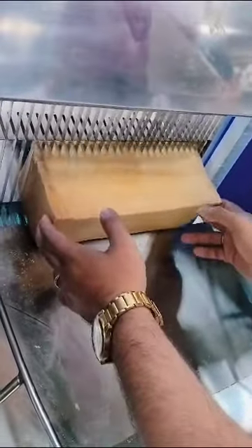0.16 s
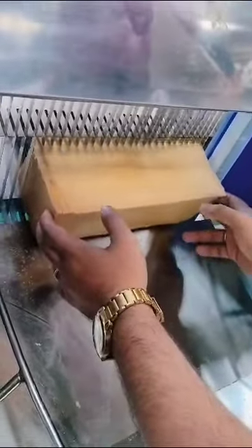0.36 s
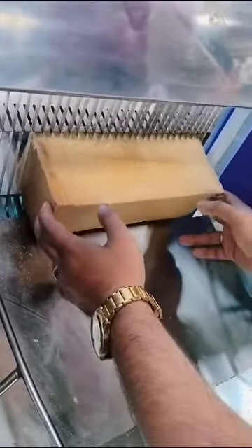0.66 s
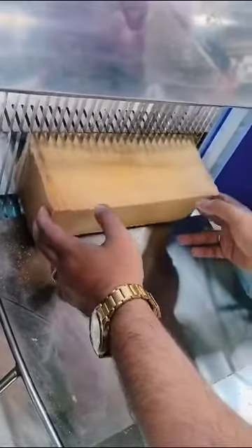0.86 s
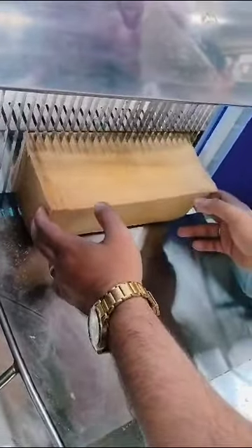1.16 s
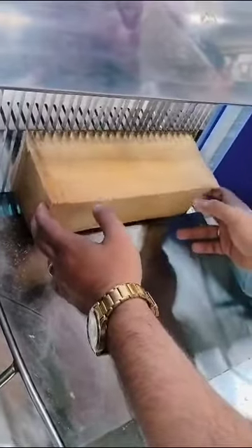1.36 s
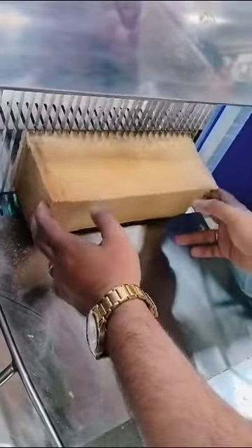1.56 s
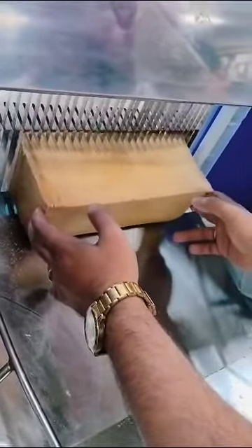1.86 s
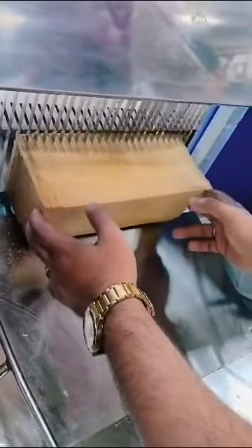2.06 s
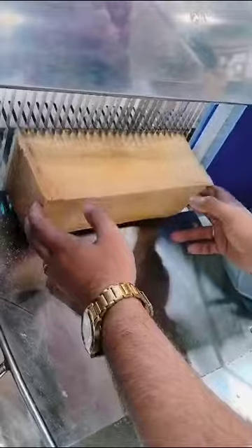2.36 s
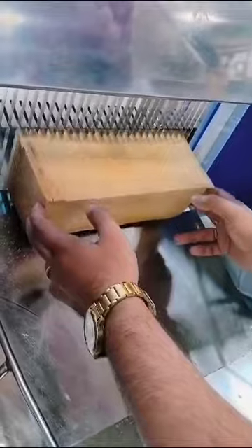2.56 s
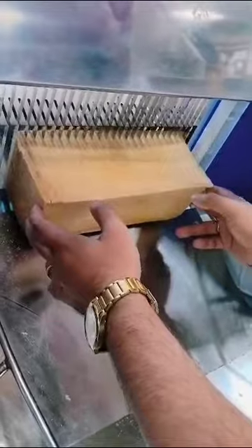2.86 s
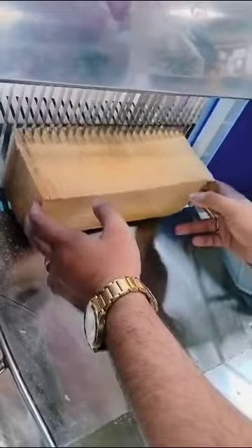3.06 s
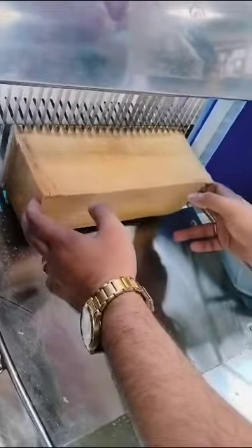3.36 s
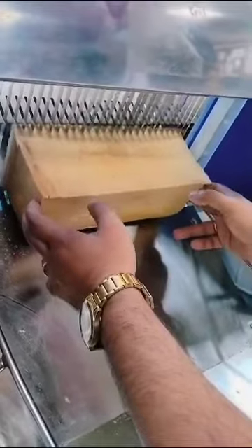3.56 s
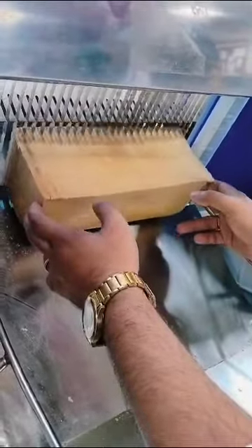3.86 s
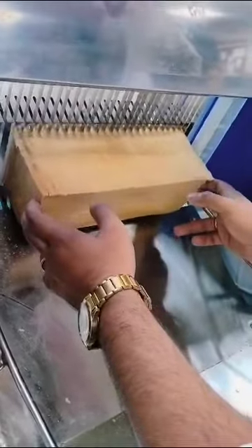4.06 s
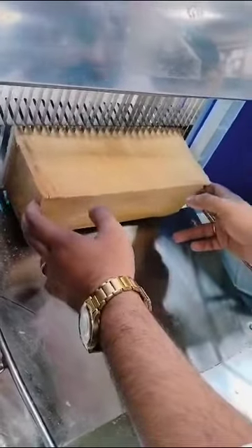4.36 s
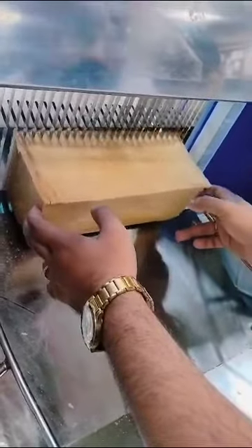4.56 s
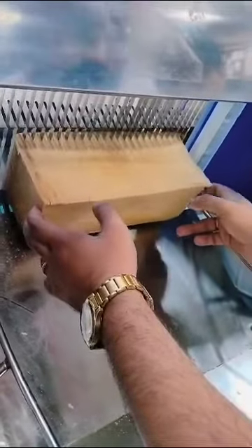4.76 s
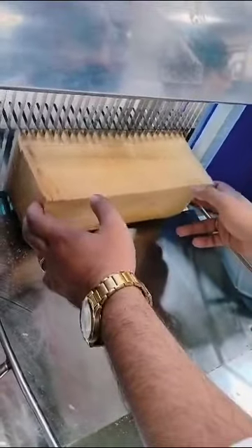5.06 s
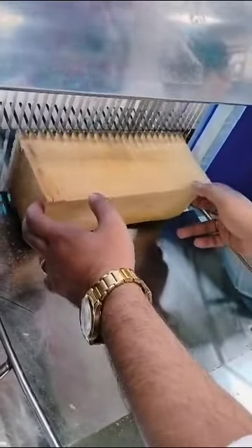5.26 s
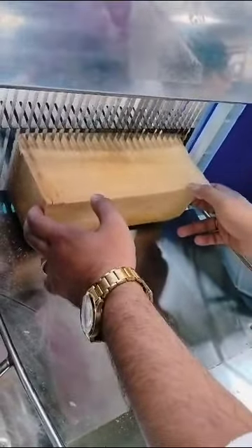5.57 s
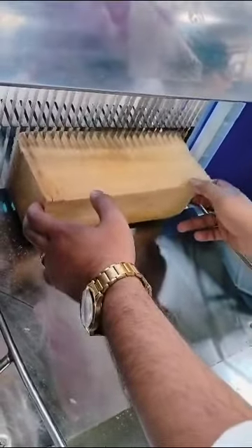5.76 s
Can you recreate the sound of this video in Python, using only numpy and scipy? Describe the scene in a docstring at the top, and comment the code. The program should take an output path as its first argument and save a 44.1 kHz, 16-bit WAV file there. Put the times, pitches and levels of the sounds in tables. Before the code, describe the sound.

A bread slicing machine is already running and never stops. A low housing hum throbs under a quick metal rattle, about nine shakes a second, while a fluttering motor whine dips about twice a second. Blades rasp softly through a loaf, with small scrapes and crust crackles. Rough judders crowd the first two and a half seconds, then thin out, bunching again near five. Close stereo pickup, with short metallic reflections.

```python
"""An electric bread slicer runs steadily close by while a loaf is eased into its blades.
From the start a belt-driven crank shakes the blade frames about nine times a second: the housing
throbs, the linkage rattles, the motor whine sags about twice a second, blades rasp, catch and ring.
Judders crowd the first 2.5 s, then thin out; the whine swells at 4 s and drops at once.
More judders bunch near 4.9 s; the rasp then rises near 5.0, 5.5 and 5.9 s."""
import sys
import numpy as np
from scipy import signal
from scipy.fft import rfft, irfft
from scipy.io import wavfile
from scipy.ndimage import uniform_filter1d, minimum_filter1d

SR = 44100
rng = np.random.default_rng(int(sys.argv[2]) if len(sys.argv) > 2 else 0)


def output_pcm(signal):
    """Save a mono or channel-first signal as 16-bit PCM at the path in sys.argv[1].

    Samples are clipped to [-1, 1] before scaling.
    """
    pcm = np.clip(np.atleast_2d(signal).T, -1, 1) * 32767
    wavfile.write(sys.argv[1], SR, np.round(pcm).astype(np.int16))


N = 260631

CRANK_HZ, STROKES_PER_BELT = 8.9, 4
BELT_HZ = CRANK_HZ / STROKES_PER_BELT  # belt turns
MAIN_WHINE_HZ = 851.6
BEAT_HZ, THROB_CREST_S = 178.05, 3.535
KNOCK_DB = -14.5
SURGE_HZ, SURGE_CREST_S, SURGE_RASP_DB = 2.1, 0.03, 1
CRUST_SPREAD_DB, CRUST_RATE_HZ = 0.8, 22
LOAD_SPREAD_DB, LOAD_RATE_HZ = 1.5, 7.7
TOP_CUT_HZ = 15700

# weak housing tones of crank, motor and mains, before hum gain: tone_hz, level_db
WEAK_HUM = [(80.12, -46), (97.95, -47), (99.95, -45.5), (160.24, -39), (169.1, -42), (175.8, -42),
            (180.05, -40), (186.96, -41), (188.94, -41), (213.71, -39), (233.56, -36), (280.02, -39),
            (281.97, -37), (284.83, -37), (342.3, -38.5), (344.8, -39), (377.8, -39.5)]
# strong housing tones that beat, before hum gain: tone_hz, level_db
THROB_TONES = [(182.09, -23.3), (191.0, -29), (195.9, -34), (197.86, -31), (199.92, -30)]
# tone at BEAT_HZ, throbs about four times a second against the strongest tone,
# before hum gain: time_s, level_db
BEAT_LEVEL = [(0, -31), (1.4, -28), (3.1, -26.5), (4.6, -29), (5.1, -39), (5.91, -38)]
# overtones of the belt's free span: multiple, relative_db
BELT_OVERTONES = [(3, -4.5), (4, -0.5), (5, -3)]
# frame response to linkage rattle: freq_hz, relative_db
FRAME_RESPONSE = [(25, -46), (45, -42.5), (70, -21.5), (140, -9), (215, -4.5), (280, -9.5), (390, -3.5),
                  (520, -8), (700, -11.5), (820, -2.5), (920, -3.5), (1100, -18.5), (1500, -27),
                  (2200, -28.5), (5000, -48.5)]
# ringing steel panels: freq_hz, width_hz, relative_db
PANEL_MODES = [(249.1, 8.1, 2), (285, 12, 0), (323.5, 16, -0.5), (344, 26, -7.5), (379.5, 24, -1.5),
               (427.4, 14, -6), (462, 35, -11), (528, 25, -4), (610.3, 23, -6), (826, 30, 0),
               (887, 24, -5.5), (949.6, 30, -6), (1024, 33, -17)]
# frames shake harder and a panel growls: crest_s, pitch_hz, level_db
JUDDER_EVENTS = [(0.03, 375, -17.5), (0.3, 370, -18), (0.37, 335, -21.5), (0.5, 250, -24),
                 (0.64, 380, -20.5), (0.73, 290, -21.5), (0.82, 385, -20.5), (0.97, 250, -24),
                 (1.04, 375, -23), (1.18, 285, -23.5), (1.35, 250, -21), (1.49, 390, -21),
                 (1.64, 285, -19.5), (2.0, 345, -23), (2.08, 290, -21.5), (2.21, 255, -22),
                 (2.34, 235, -20), (2.41, 370, -20.5), (3.04, 375, -20), (3.09, 285, -21.5),
                 (3.45, 375, -19.5), (3.84, 320, -22.5), (4.09, 295, -23.5), (4.36, 345, -20.5),
                 (4.64, 310, -21), (4.86, 605, -26), (4.87, 425, -18.5), (4.91, 320, -21.5),
                 (4.92, 552, -25.5), (4.94, 435, -21.5), (5.68, 375, -23.5), (5.79, 285, -20.5)]
# main whine sags under load: crest_s, half_length_s
WHINE_SAGS = [(0.39, .05), (0.87, .05), (1.35, .07), (1.79, .08), (2.3, .06), (2.88, .04), (3.23, .07),
              (3.67, .07), (3.86, .04), (4.12, .04), (4.33, .05), (4.84, .08), (5.5, .05), (5.9, .05)]
# higher motor tones, before load gain: tone_hz, level_db, flutter_scale_rad
HIGH_WHINE = [(949.6, -32.7, .55), (1702, -50.5, .5), (2686, -50, .5), (3809, -60, .7), (4216, -59, .7),
              (5782, -60, .35)]
# motor sings louder and softer with load: time_s, gain_db
MOTOR_LOAD = [(0.0, -1), (0.38, -0.5), (0.85, -3), (1.2, 0), (1.5, 0), (1.78, -4), (1.91, 0.5),
              (2.09, -1.5), (2.7, -2), (3.2, -1.5), (3.4, 1), (3.68, -1), (4.02, 4), (4.13, -9),
              (4.48, 1.5), (4.84, -3), (5.1, 1), (5.91, -0.5)]
# load over one stroke: crank_angle_deg, whine_db, blade_db
STROKE_LOAD = [(0, 0.5, 5), (54.4, 4.5, 5), (101, -2, 2.9), (175, 4.3, 4), (205, 0.5, 6.5), (246, 3.5, 5.5),
               (270, 2.2, 4.5), (312, 0, 3)]
# a blade catches and scrapes: crest_s, pitch_hz, level_db
ZING_EVENTS = [(0.074, 2490, -29.5), (0.074, 4100, -41), (0.46, 4200, -36.5), (0.634, 2560, -30.5),
               (0.634, 4480, -38), (0.803, 1404, -26), (0.85, 2715, -32), (1.014, 2620, -38),
               (1.364, 1585, -31), (1.802, 4240, -38), (1.939, 1550, -31.5), (1.985, 4005, -44),
               (1.991, 2990, -36), (2.315, 2920, -33), (2.378, 2600, -32), (2.416, 1460, -29),
               (2.879, 2755, -36), (3.82, 2355, -31), (3.859, 1520, -31.5), (3.939, 1380, -28),
               (4.223, 1313, -33.5), (4.296, 2314, -33), (4.48, 1643, -33), (4.899, 2475, -34),
               (4.927, 1445, -28), (5.007, 2740, -31), (5.135, 2330, -34), (5.336, 1810, -30),
               (5.567, 2900, -37), (5.69, 2620, -33)]
# crust snaps and scrapes, before snap gain: crest_s, half_length_s, peak_db
SNAP_EVENTS = [(0.075, .018, -22), (0.175, .012, -29), (0.64, .016, -26), (1.986, .016, -22),
               (2.18, .008, -28), (2.318, .024, -24), (2.42, .012, -24), (2.88, 0.013, -23),
               (3.442, .016, -25), (3.938, 0.011, -34), (4.57, .008, -25), (5.069, .008, -33),
               (5.138, 0.031, -22.5), (5.208, .008, -34), (5.775, .012, -28)]
# press of the loaf on the blades, before stroke and tearing gains: time_s, rasp_db
FEED_PRESS = [(0.0, -40.5), (0.36, -39.5), (1.07, -40), (1.65, -40), (1.76, -37.5), (2.05, -40.5),
              (2.19, -38.5), (2.96, -40.5), (3.08, -39), (3.66, -40.5), (3.74, -38.5), (4.8, -40.5),
              (5.03, -36), (5.27, -41), (5.51, -37), (5.79, -42.5), (5.91, -36.5)]
# blades sawing the crust: freq_hz, relative_db
SAWING_RESPONSE = [(600, -37), (1300, 2), (1800, 0), (2150, -6), (2600, 2.5), (3000, -10), (3400, -5.5),
                   (4200, -5.5), (4550, -17), (5850, -15.5), (6400, -34), (7100, -27.5), (7550, -38.5),
                   (8000, -40), (8800, -51.5)]
# blades singing as they are scraped: freq_hz, width_hz, relative_db
SINGING_MODES = [(1180, 25, 5), (1360, 60, 4), (1772, 45, 3), (2335, 70, 1.5), (2510, 160, 1),
                 (2720, 170, -0.5), (3560, 150, -10), (3830, 170, -9), (4020, 150, -10), (4230, 150, -9),
                 (5050, 120, -14), (5780, 120, -14)]
# spread between the microphone ports: freq_hz, side_minus_mid_db
PORT_WIDTH = [(60, -11), (170, -17), (290, -12), (480, -5), (810, -3), (1370, -1), (4000, 0)]
# balance between the ports: freq_hz, left_minus_right_db
PORT_LEAN = [(60, 1.5), (100, 1), (170, 1), (290, -0.5), (480, 4.5), (810, 3), (1370, 0), (2310, 1),
             (3890, -3.5), (6550, -1.5)]


def undb(db):
    """Decibels to gain."""
    return 10 ** (np.asarray(db) / 20)


def level(x, rms_db):
    """Scale to an rms level."""
    return x * undb(rms_db) / np.sqrt(np.mean(x ** 2))


def bins():
    """Frequency of every spectral bin, Hz."""
    return np.arange(N // 2 + 1) * SR / N


def slope(points):
    """Gain per bin, interpolated in dB on a log-frequency axis."""
    hz, db = np.transpose(points)
    return undb(np.interp(np.log(bins() + 1), np.log(hz), db))


def ring(modes):
    """Complex response per bin of summed second-order resonances."""
    f = bins()
    response = 0
    for hz, width_hz, db in modes:
        damping = 1j * f * width_hz
        response = response + undb(db) * damping / (hz ** 2 - f ** 2 + damping)
    return response


def below(hz, order=8):
    """Steep low-pass gain per bin."""
    return 1 / np.sqrt(1 + (bins() / hz) ** (2 * order))


def through(x, response):
    """Filter by a response per bin."""
    return irfft(rfft(x) * response, N)


def walk(rate_hz):
    """Smooth zero-mean chance of rms 1, changing about rate_hz times a second."""
    lowpass = np.exp(-(bins() / rate_hz) ** 2) * (bins() > 0)
    return level(through(rng.standard_normal(N), lowpass), 0)


def swell(t, crest_s, half_length_s):
    """Gaussian bump that rises and falls around crest_s."""
    return np.exp(-((t - crest_s) / half_length_s) ** 2)


def cyclic(turns, turn_hz, top_hz=SR / 2):
    """Random pattern of rms 1, up to top_hz, repeating on every turn."""
    size = int(SR / turn_hz)
    hz = np.arange(size // 2 + 1) * turn_hz
    phases = np.exp(2j * np.pi * rng.random(len(hz)))
    pattern = irfft(phases * ((hz > 0) & (hz < top_hz)), size)
    return level(np.interp(turns, np.arange(size) / size, pattern, period=1), 0)


def chatter(crank, belt_db, loose_db):
    """Dense contacts, mid and side: some repeat each stroke, some each belt turn, some never."""
    def contacts():
        per_belt = undb(belt_db) * cyclic(crank / STROKES_PER_BELT, BELT_HZ)
        per_stroke = cyclic(crank, CRANK_HZ)
        loose = undb(loose_db) * rng.standard_normal(N)
        return level(per_stroke + per_belt + loose, 0)
    return np.array([contacts(), contacts()])


def ports(pair):
    """Mid and side to left and right: bass arrives alike, treble by many paths."""
    width = slope(PORT_WIDTH)
    mid, side = pair[0], through(pair[1], width)
    return through(np.array([mid + side, mid - side]), 1 / np.sqrt(1 + width ** 2))


def hum(t, clock, gain_db=2.0):
    """Strong housing tones, in phase at THROB_CREST_S, beat; weak ones wander and make it uneven."""
    strong = 0
    for hz, db in THROB_TONES + [(BEAT_HZ, np.interp(t, *np.transpose(BEAT_LEVEL)))]:
        strong = strong + undb(db) * np.sin(2 * np.pi * hz * (clock - THROB_CREST_S))
    weak = 0
    for hz, db in WEAK_HUM:
        weak = weak + undb(db + 2 * walk(2.6)) * np.sin(2 * np.pi * (hz * clock + rng.random()))
    return undb(gain_db) * np.sqrt(2) * (strong + weak)


def belt(crank, span_hz=92, stretch=0.0349, slip=0.02592, flap_db=2.5, gain_db=-26):
    """The belt drones; its pitch follows the tension, which rises and falls as it goes round."""
    tension = stretch * cyclic(crank / STROKES_PER_BELT, BELT_HZ, top_hz=7) + slip * walk(6.71)
    phase = 2 * np.pi * np.cumsum(span_hz * (1 + tension)) / SR
    drone = 0
    for multiple, db in BELT_OVERTONES:
        drone = drone + undb(db + flap_db * walk(8.3)) * np.sin(multiple * phase)
    return level(drone, gain_db)


def rattle(crank, frame_db=-4, panel_db=-4.0):
    """Play in the linkage knocks the frame and rings its panels."""
    frame = through(chatter(crank, belt_db=0, loose_db=-7.0), slope(FRAME_RESPONSE) * below(4700))
    panels = through(chatter(crank, belt_db=8.0, loose_db=5.5), ring(PANEL_MODES) * below(1297))
    return ports(level(frame, frame_db) + level(panels, panel_db)) * undb(KNOCK_DB)


def judder(t, half_length_s=0.042, waver=0.04, waver_hz=12, rough=0.55, rough_hz=55):
    """Blade frames shake harder and a panel swells into a short, rough, wavering growl."""
    wavers = np.array([walk(waver_hz), walk(waver_hz)])
    bent_s = np.cumsum(1 + waver * wavers, axis=1) / SR
    grain = 1 + rough * (walk(rough_hz) + 1j * walk(rough_hz))
    grain = grain * np.sqrt(2 / (1 + 2 * rough ** 2))  # growl to rms 1
    out = np.zeros((2, N))
    starts = rng.random((len(JUDDER_EVENTS), 2))
    for (crest_s, hz, db), start in zip(JUDDER_EVENTS, starts):
        near = np.abs(t - crest_s) < 4 * half_length_s
        turns = hz * bent_s[:, near] + start[:, None]
        growl = np.real(grain[near] * np.exp(2j * np.pi * turns))
        out[:, near] += undb(db) * swell(t[near], crest_s, half_length_s) * growl
    return ports(out)


def whine(t, crank, clock, load_db, main_db=-22.0, sag_db=-3.0, sag_hz=19):
    """Motor tones flutter as the frames brake the rotor twice a stroke; the main one sags in level and pitch."""
    sway, shake, drift = 0.45, 0.55, 0.4  # shares of flutter
    spread, lead_rad, main_depth_rad = 0.65, 0.23, 0.47
    sags = [swell(t, crest_s, half_s) for crest_s, half_s in WHINE_SAGS]
    slipped = 0
    for sag in sags:
        whole_cycles = np.round(sag_hz * sag.sum() / SR)
        slipped = slipped + whole_cycles * np.cumsum(sag) / sag.sum()
    tones = [(MAIN_WHINE_HZ * clock - slipped, main_db + sag_db * sum(sags), main_depth_rad)]
    tones += [(hz * clock, db, depth_rad) for hz, db, depth_rad in HIGH_WHINE]
    braking = sway * np.sin(4 * np.pi * crank)
    out = np.zeros((2, N))
    for cycles, db, depth_rad in tones:
        flutter = braking + shake * cyclic(crank, CRANK_HZ, top_hz=60) + drift * walk(2.8)
        phase = 2 * np.pi * (cycles + rng.random()) + depth_rad * flutter
        for port, offset_rad in enumerate((lead_rad, -lead_rad)):
            path = spread * cyclic(crank, CRANK_HZ, top_hz=100)  # each port has its own shaking path
            out[port] += np.sqrt(2) * undb(db) * np.sin(phase + offset_rad + depth_rad * path)
    return undb(load_db) * out


def zings(t, half_length_s=0.018, width_hz=520):
    """A blade catches in the crust and scrapes briefly: a noise band at a listed pitch."""
    grain = np.array([walk(width_hz) + 1j * walk(width_hz) for _ in range(2)])
    out = np.zeros((2, N))
    for crest_s, hz, db in ZING_EVENTS:
        near = np.abs(t - crest_s) < 4 * half_length_s
        scrape = np.real(grain[:, near] * np.exp(2j * np.pi * hz * t[near]))
        out[:, near] += undb(db) * swell(t[near], crest_s, half_length_s) * scrape
    return out


def snaps(t, gain_db=-14, bright_hz=4700, width_hz=3000, floor_db=-32):
    """Bits of crust give way in short grainy crunches of noise that swell and fade."""
    bursts = sum(undb(db) * swell(t, crest_s, half_s) for crest_s, half_s, db in SNAP_EVENTS)
    grain_db = 2.5 * walk(400)
    bursts = bursts * level(undb(grain_db), 0)
    body = ring([(bright_hz, width_hz, 0)]) ** 2 * (below(6300, order=12) + undb(floor_db))
    body = body / np.sqrt(np.mean(np.abs(body) ** 2))
    return undb(gain_db) * through(rng.standard_normal((2, N)) * bursts, body)


def surge(t):
    """The loaf advances and eases about twice a second, between -1 and 1."""
    return np.cos(2 * np.pi * SURGE_HZ * (t - SURGE_CREST_S))


def hood(x, decay_s=0.033, echo=0.59):
    """Direct sound plus dense short reflections inside the steel hood."""
    t = np.arange(2048) / SR
    tail = rng.standard_normal(len(t)) * np.exp(-t / decay_s)
    return x + echo * signal.fftconvolve(x, tail / np.linalg.norm(tail))[:N]


def rasp(crank, push_db, tear_db=5.5, sing_db=0.5, fleck_db=4.0):
    """Serrated blades tear the crust in uneven grains, which set the blades ringing in short flecks."""
    mean_push_db = np.mean(push_db)
    grain_db = 1.0 * walk(440) + 0.67 * walk(70)
    teeth = chatter(crank, belt_db=2.0, loose_db=11.5) * undb(grain_db + push_db - mean_push_db)
    tearing = through(np.array([hood(c) for c in teeth]), slope(SAWING_RESPONSE))
    top = below(6320, order=12)
    singing = 0
    for mode in SINGING_MODES:
        flecks = teeth[::-1] * undb(fleck_db * walk(30))  # mid and side swapped
        singing = singing + through(flecks, ring([mode]) * top)
    return ports(level(tearing, tear_db) + level(singing, sing_db)) * undb(mean_push_db)


def scene(wander_s=0.00018):
    """One wandering clock times hum, belt, rattle, whine and rasp; stroke load shapes whine and rasp."""
    t = np.arange(N) / SR
    clock = t + wander_s * walk(3.02)  # the belt creeps as the load changes
    crank = CRANK_HZ * clock  # strokes
    angle_deg, whine_points_db, blade_points_db = np.transpose(STROKE_LOAD)
    crank_rad, angle_rad = 2 * np.pi * crank, np.radians(angle_deg)
    whine_db = np.interp(crank_rad, angle_rad, whine_points_db, period=2 * np.pi)
    blade_db = np.interp(crank_rad, angle_rad, blade_points_db, period=2 * np.pi)
    feed_db = np.interp(t, *np.transpose(FEED_PRESS))
    motor_db = np.interp(t, *np.transpose(MOTOR_LOAD))
    crust_db = CRUST_SPREAD_DB * walk(CRUST_RATE_HZ)
    push_db = feed_db + blade_db + SURGE_RASP_DB * surge(t) + crust_db
    load_db = motor_db + whine_db + LOAD_SPREAD_DB * walk(LOAD_RATE_HZ)
    machine = hum(t, clock) + belt(crank) + rattle(crank) + judder(t) + whine(t, crank, clock, load_db)
    return machine + zings(t) + snaps(t) + rasp(crank, push_db)


def record(dry):
    """The two ports colour the sound differently; a limiter eases the tallest peaks; the top is cut."""
    lean = np.sqrt(slope(PORT_LEAN))
    heard = through(dry, np.array([lean, 1 / lean]))
    allowed = 0.9 / np.maximum(np.abs(heard).max(axis=0), 0.9)
    held = minimum_filter1d(allowed, size=441)  # 10 ms
    gain = uniform_filter1d(uniform_filter1d(held, size=221), size=221)
    top_cut = signal.ellip(8, 0.2, 70, TOP_CUT_HZ, fs=SR, output="sos")
    return signal.sosfilt(top_cut, heard * gain)


dry = scene()
out = record(dry)
output_pcm(out)
```